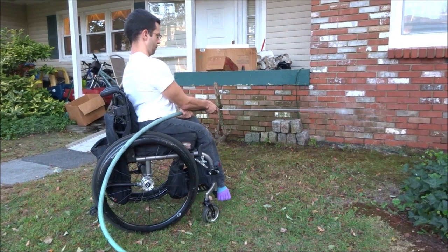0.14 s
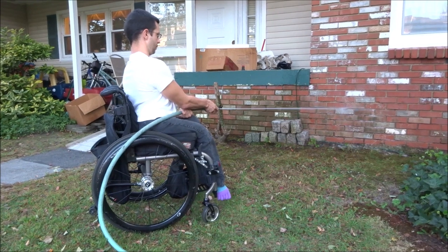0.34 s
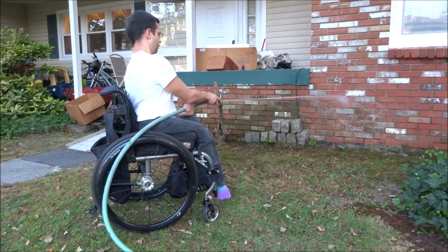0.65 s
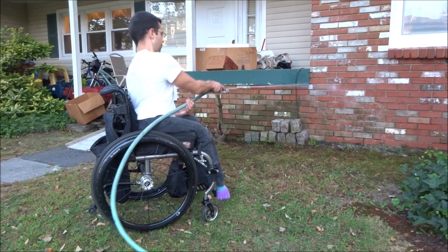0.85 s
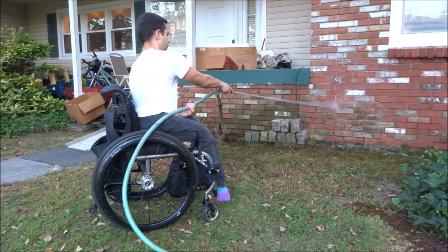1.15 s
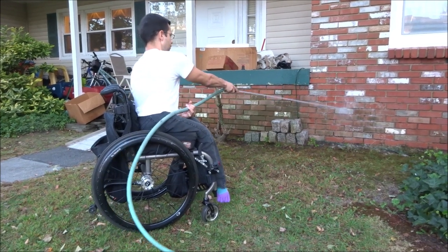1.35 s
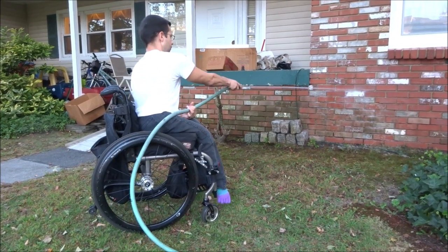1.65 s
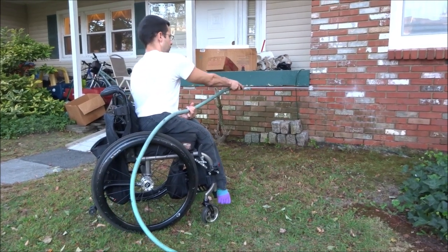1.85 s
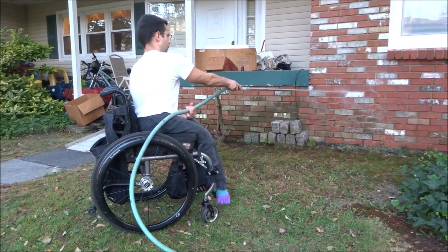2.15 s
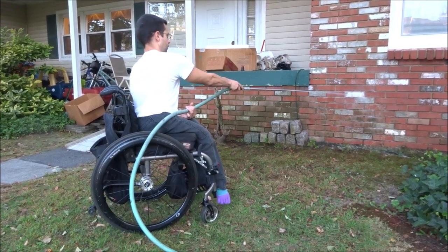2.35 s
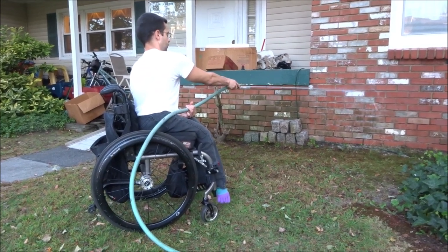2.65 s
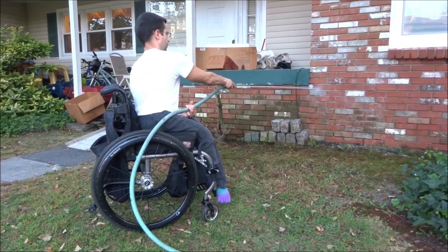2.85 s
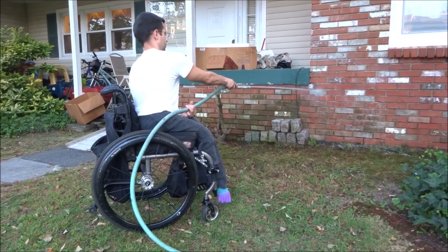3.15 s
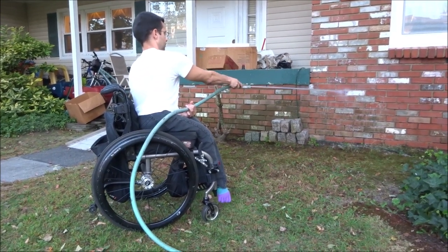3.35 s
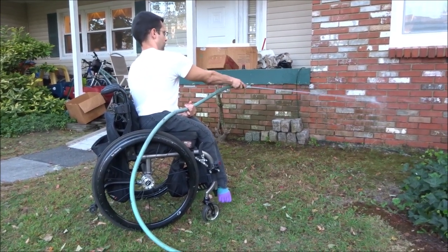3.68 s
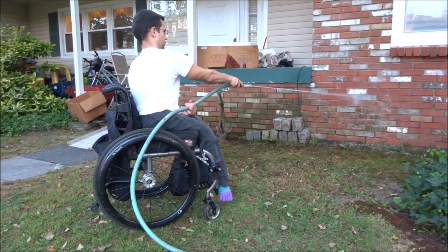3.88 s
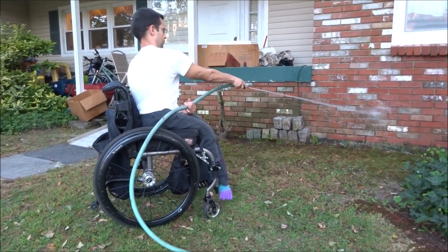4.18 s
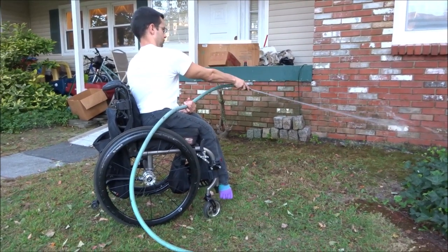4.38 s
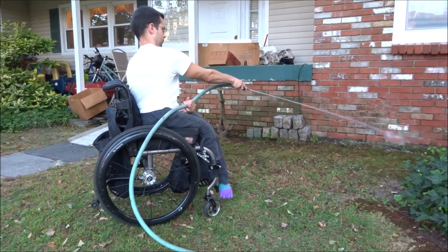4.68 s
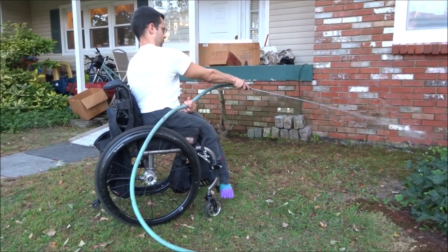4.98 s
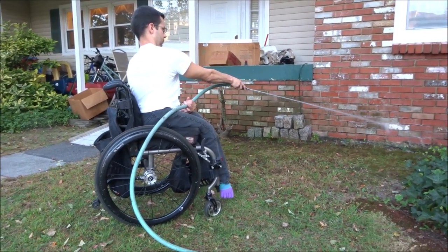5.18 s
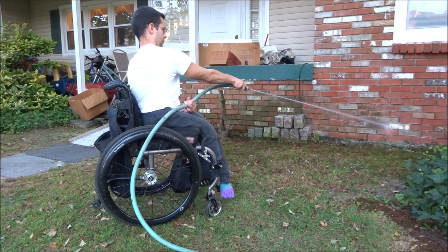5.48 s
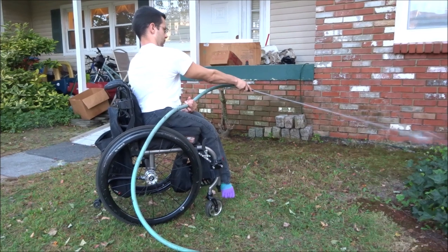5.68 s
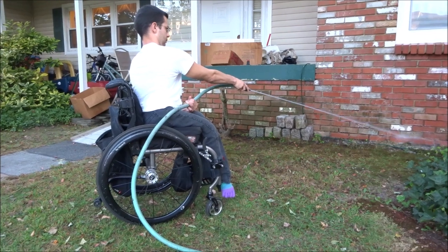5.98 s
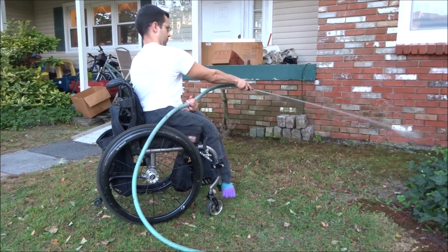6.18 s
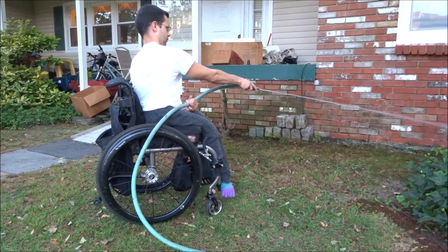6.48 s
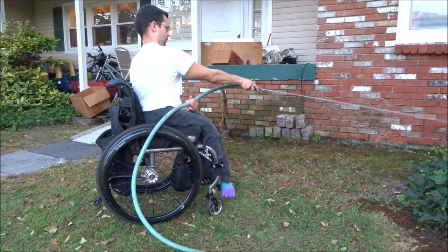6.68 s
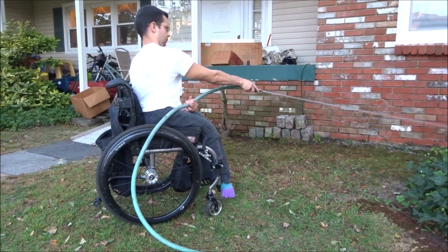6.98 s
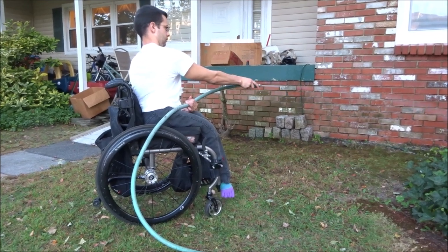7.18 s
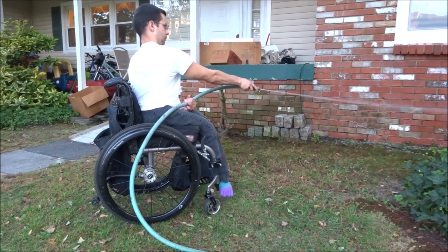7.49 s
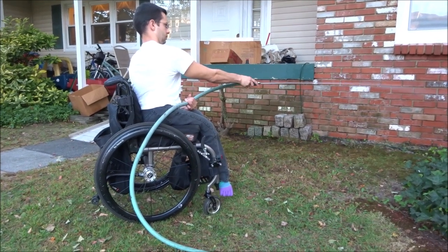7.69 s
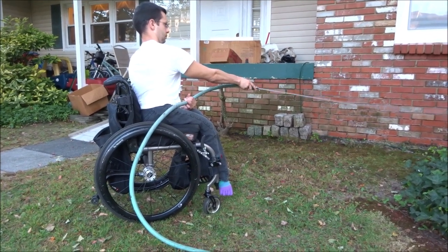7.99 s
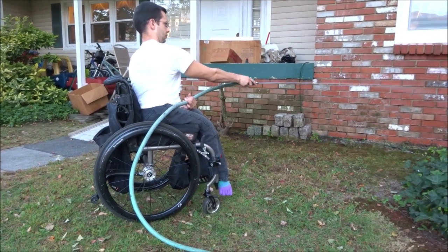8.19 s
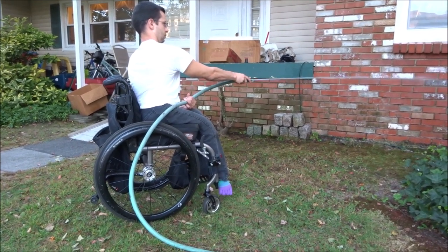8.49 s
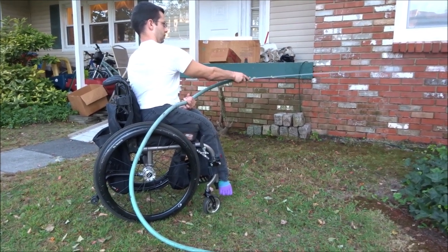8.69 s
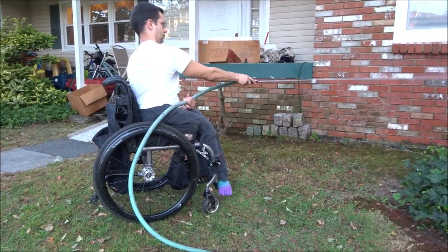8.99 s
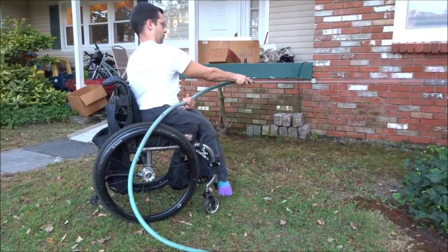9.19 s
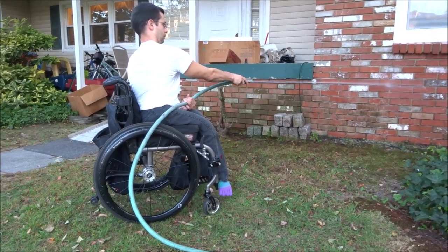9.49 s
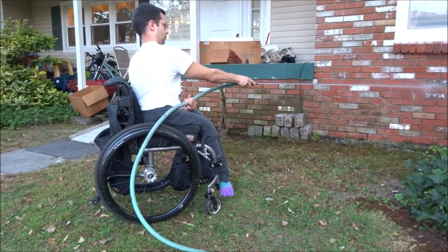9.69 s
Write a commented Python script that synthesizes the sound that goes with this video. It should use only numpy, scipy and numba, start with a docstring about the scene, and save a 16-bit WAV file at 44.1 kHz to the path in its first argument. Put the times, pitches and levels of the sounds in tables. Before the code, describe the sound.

Water from a garden hose hisses and splatters against bricks in uneven surges, over soft run-off patter and a barely audible traffic hum.

```python
"""A narrow hose jet sweeps a brick wall a few metres off, across a lawn. From the start, fine drops
crackle into mist, bigger slugs slap and ring the air they trap in mortar joints, ledge and ground
echo, run-off patters below and far traffic hums. From 0.3 s, surges of heavy water come irregularly.
From 3.1 s, far engine notes fade in and out and the traffic grows. The ledge echo all but vanishes
at 4.5 s and returns near 9.5 s."""
import sys
import numpy as np
from scipy import signal
from scipy.fft import rfft, irfft
from scipy.io import wavfile
from scipy.ndimage import uniform_filter1d, map_coordinates
from numba import njit

SR = 44100
rng = np.random.default_rng(int(sys.argv[2]) if len(sys.argv) > 2 else 0)


def pcm_store(signal):
    """Save signal as 16-bit PCM."""
    levels = np.round(np.clip(np.atleast_2d(signal), -1, 1) * 32767)
    wavfile.write(sys.argv[1], SR, levels.astype(np.int16).T)


N = 433944

# Jet between surges: t/s, mist/dB, spray, ring, slaps (each /dB re mist), ring f/Hz, run-off/dB
JET = [(0, -23.5, -2, -1.5, -14.5, 5000, -54.5), (0.4, -24, -5.5, -4, -14, 4760, -59),
       (0.7, -26, -0.5, -0.3, -9, 4370, -56), (1.3, -24.5, -1, -1.2, -11, 4830, -59),
       (2, -24.5, -4, -2, -15, 4670, -57.0), (2.7, -26, 0, -1.3, -11.5, 4470, -60),
       (3.5, -23, -4, -5, -14.5, 4570, -57.5), (4.2, -25.5, -1.5, -1.5, -11.5, 4430, -53.5),
       (4.7, -25.5, -3.5, -3.7, -11.5, 4430, -49.5), (5.2, -26.5, -2.5, -2.5, -12.5, 3720, -54.5),
       (5.8, -24.5, -3, -6.5, -16.5, 4500, -51.5), (6.3, -26, -4, -1.9, -12.2, 4240, -48.5),
       (6.9, -27.0, -6.5, -0.4, -10.5, 4460, -50.0), (7.2, -30, -3, -1.5, -11, 4340, -46.5),
       (7.6, -27.5, -5.6, -1.6, -10.5, 4330, -46.5), (8.3, -27.5, -2.5, -4.5, -10.5, 4310, -50),
       (8.7, -26.4, -0.5, -1.1, -13.8, 4600, -52), (9.3, -26.5, -3, -1.7, -12.5, 4430, -51.2),
       (9.84, -26, -3.5, -2.2, -10.5, 4170, -47.5)]
# Heavy water: centre t/s, length/s, slap lift/dB, ring lift/dB, ring f/Hz, run-off lift/dB
SURGES = [(0.306, 0.13, 3, 3, 3530, -3), (0.521, 0.087, 9.5, -7, 3540, 12), (0.696, 0.089, 4, 7.5, 3730, 3),
          (0.808, 0.022, -2, 12, 4300, -9), (0.952, 0.022, 6.5, 11, 4070, -2),
          (1, 0.019, 7.5, 15, 4580, -5), (1.052, 0.028, 5, 11, 4250, -6), (1.158, 0.025, 7, 11, 4500, 0),
          (1.207, 0.084, 11, 2, 4340, 6), (1.42, 0.034, 2, 10, 3550, 7), (1.532, 0.052, 7, 1, 3600, 7),
          (1.633, 0.073, 1, 8, 4300, 3), (1.845, 0.02, 9, 4, 4300, -1), (2.135, 0.045, 6.5, 9.5, 4100, -8),
          (2.625, 0.15, 3, 14.5, 4180, 5), (2.94, 0.067, 10.5, 9.5, 4270, 4), (3.024, 0.028, 6, 5, 3870, 2),
          (3.246, 0.1, 5.5, 8, 4200, 1), (3.36, 0.088, 7, 4, 4600, 9), (3.53, 0.062, 10, 9, 3800, 8.5),
          (3.853, 0.016, 7, 4, 3600, -5), (4.03, 0.053, 9.5, 13, 3920, -3), (4.12, 0.079, 8, 7, 4550, 3),
          (4.264, 0.044, 12, -7, 3360, 8), (4.343, 0.028, 6, 2, 3690, 1), (4.768, 0.082, 7, 1, 3450, 3),
          (4.984, 0.034, 9, 11, 4000, 5), (5.178, 0.025, -2, 8, 3570, 7), (5.348, 0.11, 3, 2, 2890, 8),
          (5.534, 0.093, 5, 6, 3670, 11), (5.7, 0.043, 6, 14, 4270, 6), (5.935, 0.04, 0, 13, 4240, 5),
          (5.974, 0.021, 11, 7, 4830, 10), (6.118, 0.091, 9, 1, 3020, 7), (6.388, 0.024, 2, -10, 3150, 2),
          (6.514, 0.042, 5, 14, 4680, -6), (6.565, 0.039, -1, 5, 3900, -3), (6.753, 0.029, 1, 12, 4100, -3),
          (6.823, 0.074, 4, 14, 4160, 0), (6.884, 0.066, -1, 12.5, 4200, 1), (7.03, 0.016, -4, 9, 3960, 2),
          (7.412, 0.048, 7, 12, 4330, -2), (7.49, 0.15, 2, -1, 3750, -2), (7.521, 0.03, 4, 10, 4100, 3),
          (7.554, 0.023, -1, 11, 4300, 5), (7.644, 0.037, 3, 9, 3840, 6), (7.845, 0.041, 6, 15.5, 4200, -3),
          (8.13, 0.079, 3, 8, 3770, 2), (8.357, 0.044, 4, 17.5, 4080, 2.5), (8.466, 0.023, 2, 14, 4140, 4),
          (8.593, 0.033, 5, 18, 4200, -3), (8.776, 0.025, 6, 11, 4970, 3), (8.864, 0.11, 2.5, 4, 3980, 9.5),
          (9.024, 0.047, 1, -15, 3170, 10.5), (9.082, 0.052, 4, 7, 4400, 7), (9.21, 0.039, 5, -9, 4900, 1),
          (9.28, 0.019, -5, 8, 4200, 5.5), (9.402, 0.042, -3, 10, 4000, -4),
          (9.618, 0.13, 7, 11.5, 4080, 2)]
# Landing spot: t/s, mist peak f/Hz, peak level/dB re mist, left minus right/dB
AIM = [(0, 8600, -22, -.9), (.6, 7500, -39, -.7), (2.2, 7550, -19, -1), (3.0, 7800, -32, -.7),
       (4.0, 7800, -25, -1.2), (5.1, 7430, -24, -1.8), (5.85, 7330, -12, -1.8), (6.4, 7130, -22, -1.9),
       (7.4, 7000, -14.5, -2.5), (8.4, 7130, -12, -2), (9.84, 7100, -29, -1.7)]
# Echoes moving with the aim: t/s, ledge delay/ms, ledge level/dB, ground delay/ms
ECHOES = [(0, 0.53, -7, 1.5), (.45, 0.61, -8, 2.3), (.75, 0.87, -15, 1.5), (1.3, 0.51, -20, 1.93),
          (1.75, 0.92, -12, 1.95), (2.4, 0.84, -8.5, 1.93), (3.4, .86, -8, 1.9), (3.7, 0.76, -8.5, 1.7),
          (4.1, 0.68, -8, 1.93), (4.5, .7, -47, 1.76), (6.3, 0.83, -43, 1.96), (6.7, 0.74, -30, 1.82),
          (8.3, 0.49, -29, 1.9), (9.2, 0.83, -36, 1.95), (9.5, 0.88, -1, 2.1), (9.84, .87, -12, 1.8)]
# Traffic rumble: t/s, deep level/dB, upper level/dB
TRAFFIC_LEVELS = [(0, -79, -75), (0.3, -80, -80), (0.6, -68, -62), (0.8, -74, -70), (2.7, -79.5, -76),
                  (3.6, -68, -61.5), (4.2, -66, -60.5), (4.6, -67, -62), (5.2, -71.5, -67.5),
                  (6, -71, -61.5), (6.5, -61, -59), (7.6, -63, -56), (8.2, -66, -61), (8.7, -71, -67),
                  (9.2, -71, -63), (9.84, -66, -65)]
# Engine notes: start t/s, end t/s, first f/Hz, last f/Hz, fundamental/dB, octave/dB
ENGINE_NOTES = [(3.106, 4.307, 122.4, 139.4, -79, -62.5), (3.95, 4.35, 148, 159, -60, -76),
                (6.1, 7.6, 140, 141.2, -62, -73), (7.45, 10.1, 104.8, 104.6, -78.5, -67)]
# Spectral shapes: f/Hz, relative level/dB
MIST_SHAPE = [(3000, -35), (4800, -5.5), (5600, -1), (6700, 0), (7600, 0.5), (8500, -1.5), (9500, -18)]
SPRAY_SHAPE = [(7500, -23.5), (8600, 1), (9300, 7), (10500, 10), (12000, -7.5)]
SLAP_SHAPE = [(700, -23.5), (1200, -8), (1600, -7), (2000, -3), (2500, -1), (3100, 1.5), (3800, 4),
              (5000, -31)]
RUNOFF_SHAPE = [(350, -43.5), (500, -9), (700, 2), (850, -0.5), (1000, -6.5), (1300, -5), (2000, -30)]
DEEP_TRAFFIC_SHAPE = [(25, -24), (50, -16), (80, -6), (130, 2.5), (170, -1.5), (200, -11), (280, -37)]
UPPER_TRAFFIC_SHAPE = [(120, -26), (185, -1.5), (215, 0.5), (270, 1), (369, -2.5), (430, -6), (520, -20),
                       (700, -37)]


def undb(db):
    return 10 ** (np.asarray(db) / 20)


def unit(x):
    return x / np.sqrt(np.mean(x ** 2))


def curves(table):
    """Columns after t/s, interpolated per sample."""
    t_s, *columns = np.transpose(table)
    return [np.interp(np.arange(N) / SR, t_s, c) for c in columns]


def walk(rate_hz):
    """Random steps, smoothed twice; deviation near 1."""
    hold = int(SR / rate_hz)
    steps = rng.standard_normal(N)[np.arange(N) // hold]
    return 1.286 * uniform_filter1d(uniform_filter1d(steps, hold), hold)


def colour(pair, shape, size=8192):
    """Minimum-phase filter via the cepstrum; output rms 1."""
    hz, db = np.transpose(shape)
    log_hz = np.log(np.arange(size // 2 + 1) * SR / size + 1)
    log_gain = np.interp(log_hz, np.log(hz), db, left=db[0] - 19) * np.log(10) / 20
    cepstrum = irfft(log_gain)
    cepstrum[1:size // 2] *= 2
    cepstrum[size // 2 + 1:] = 0
    response = irfft(np.exp(rfft(cepstrum)))
    return unit(signal.fftconvolve(pair, response[None], axes=1)[:, :N])


@njit
def bandpass(x, hz, width_hz):
    """State-variable filter, retuned per sample."""
    y, band, low = np.empty(len(x)), 0., 0.
    for i in range(len(x)):
        g, damping = np.tan(np.pi * hz[i] / SR), width_hz / hz[i]
        v = (band + g * (x[i] - low)) / (1 + g * (g + damping))
        band, low, y[i] = 2 * v - band, low + 2 * g * v, damping * v
    return y


def resonate(channels, hz, width_hz):
    """Band-pass twice for steep skirts; output rms 1."""
    return unit(np.array([bandpass(bandpass(c, hz, width_hz), hz, width_hz) for c in channels]))


def delay(pair, ms):
    at = np.arange(N) - ms * SR / 1000
    return np.array([map_coordinates(c, [at], order=3, mode="nearest") for c in pair])


def drops(rate_hz, scatter_db, decay_ms):
    """Random impacts of uneven size, each a decaying noise burst."""
    chance, size = rng.random((2, N))
    hits = (chance < rate_hz / SR) * undb(np.minimum(-scatter_db * np.log(1 - size), 6))
    pole = np.exp(-1000 / (decay_ms * SR))
    return unit(signal.lfilter([1], [1, -pole], hits) * rng.standard_normal(N))


def spread(x, hiss_db, side_db):
    """Mono to stereo: add steady hiss, and side noise that follows the level."""
    hiss, side = rng.standard_normal((2, N))
    envelope = np.sqrt(uniform_filter1d(x ** 2, size=600) + undb(2 * hiss_db))
    return x + undb(hiss_db) * hiss + undb(side_db) * envelope * side * np.array([[1], [-1]])


def surge_curves(rise=0.34, fall=0.51):
    """Lifts, 0-1 weight and pitch of the surges; rise and fall are shares of their length."""
    slap_db, ring_db, runoff_db, weight, pitch_hz = np.zeros((5, N))
    t = np.arange(N) / SR
    for centre_s, length_s, slap_up_db, ring_up_db, hz, runoff_up_db in SURGES:
        span = slice(max(int((centre_s - 2 * length_s) * SR), 0), int((centre_s + 2 * length_s) * SR))
        offset_s = t[span] - centre_s
        bump = np.exp(-(offset_s / (np.where(offset_s < 0, rise, fall) * length_s)) ** 2)
        slap_db[span] += slap_up_db * bump
        ring_db[span] += ring_up_db * bump
        runoff_db[span] += runoff_up_db * bump
        pitch_hz[span] = np.where(bump > weight[span], hz, pitch_hz[span])
        weight[span] = np.maximum(weight[span], bump)
    return slap_db, ring_db, runoff_db, weight, pitch_hz


def mist(stream, peak_hz, peak_db):
    """Fine drops burst on brick; a faint treble peak follows the aim."""
    impacts = spread(stream, hiss_db=-1.7, side_db=-15.5)
    peak = resonate(impacts, peak_hz * (1 + 0.012 * walk(5.8)), width_hz=1060.)
    crackle = unit(colour(impacts, MIST_SHAPE) + undb(peak_db) * peak)
    return crackle * undb(0.77 * walk(40) + 0.77 * walk(7))


def spray(stream):
    """The finest drops sizzle above the mist."""
    impacts = spread(stream + 1.3 * drops(1200, 4.9, 0.11), hiss_db=-0.17, side_db=-14)
    return colour(impacts, SPRAY_SHAPE) * undb(1.2 * walk(6.4) + 0.51 * walk(40))


def pocket_ring(slugs, ring_hz):
    """Slugs ring air trapped in the joints; pocket sizes vary, so the pitch wanders."""
    impacts = spread(slugs, hiss_db=-3, side_db=-25)
    narrow = resonate(impacts, ring_hz * (1 + 0.059 * walk(25)), width_hz=770.)
    broad = resonate(impacts, 0.92 * ring_hz, width_hz=2180.)
    return unit(narrow + 2.03 * broad) * undb(0.66 * walk(13) + 1.36 * walk(45))


def slaps(slugs, ring_hz):
    """Heavy water hits the wall: a broad smack below the ring."""
    impacts = spread(slugs + 1.18 * drops(120, 3.6, 3.2), hiss_db=2, side_db=-7.5)
    body = resonate(impacts, 0.735 * ring_hz * (1 + 0.13 * walk(40)), width_hz=320.)
    smack = unit(colour(impacts, SLAP_SHAPE) + 0.19 * body)
    return smack * undb(1.76 * walk(8.5) + 0.72 * walk(25))


def echoes(direct, ground_db=-22.5, tail_db=-13, t60_s=0.038):
    """Direct sound plus ledge and ground echoes and scatter off porch and house fronts."""
    ledge_ms, ledge_db, ground_ms = curves(ECHOES)
    dull = signal.sosfilt(signal.butter(1, 5900, fs=SR, output="sos"), direct)  # brick scatters treble
    ledge = undb(ledge_db) * delay(dull, ledge_ms + 0.025 * walk(5.4))
    ground = undb(ground_db) * delay(direct, ground_ms)
    t = np.arange(SR // 4) / SR
    response = rng.standard_normal(len(t)) * undb(-60 * t / t60_s) * (t > .003)
    tail = signal.fftconvolve(direct, response[None] / np.linalg.norm(response), axes=1)[:, :N]
    return direct + ledge + ground + undb(tail_db) * tail


def runoff(level_db):
    """Water off the wall patters on wet soil, slightly right."""
    patter = colour(spread(drops(150, 2.2, 9.6), hiss_db=-0.36, side_db=-7), RUNOFF_SHAPE)
    return patter * undb(level_db + 0.98 * walk(22) + np.array([[-.4], [.4]]))


def traffic():
    """Far road: two bands of rumble with a partly shared flutter."""
    deep_db, upper_db = np.array(curves(TRAFFIC_LEVELS)) + 1.8 * walk(13)
    deep = colour(spread(rng.standard_normal(N), hiss_db=-9, side_db=-18), DEEP_TRAFFIC_SHAPE)
    upper = colour(spread(rng.standard_normal(N), hiss_db=-5.5, side_db=-11), UPPER_TRAFFIC_SHAPE)
    return deep * undb(deep_db + 1.4 * walk(12)) + upper * undb(upper_db + 2 * walk(15))


def slug_clusters(mist_db, re_mist_db=-9):
    """One cluster per surge: dense impacts swell, ring at their own pitch and die."""
    out = np.zeros(N)
    impacts = drops(900, 1.7, 0.85)
    for centre_s, length_s, _, ring_up_db, hz, _ in SURGES:
        start = int((centre_s - length_s / 2) * SR)
        t = np.arange(min(int(3 * length_s * SR), N - start)) / SR
        span = slice(start, start + len(t))
        pitch_hz = hz * (1 + 0.5 * t)  # pockets shrink as they burst
        ring = resonate([impacts[span]], pitch_hz, width_hz=1060.)[0]
        body = resonate([impacts[span]], .55 * pitch_hz, width_hz=1800.)[0]
        envelope = (1 - np.exp(-t / (0.21 * length_s))) * np.exp(-(t / (0.74 * length_s)) ** 2)
        out[span] += undb(mist_db[start] + re_mist_db + ring_up_db) * (ring + 0.071 * body) * envelope
    return out


def engines(fade_s=0.19):
    """Far engines: each a rough, wavering note and its octave."""
    out, t = np.zeros(N), np.arange(N) / SR
    for start_s, end_s, first_hz, last_hz, low_db, octave_db in ENGINE_NOTES:
        hz = np.interp(t, [start_s, end_s], [first_hz, last_hz])
        phase = 2 * np.pi * np.cumsum(hz * (1 + 0.014 * walk(11) + 0.0262 * walk(70))) / SR
        fade = np.clip(np.minimum(t - start_s, end_s - t) / fade_s, 0, 1)
        low = undb(low_db + 1.4 * walk(14)) * np.sin(phase)
        octave = undb(octave_db + 2.3 * walk(13)) * np.sin(2 * phase)
        out += fade * np.sqrt(2) * (low + octave)
    return out


def scene():
    """Jet on the wall over run-off and traffic; one drop stream makes its bands crackle together."""
    mist_db, spray_db, ring_db, slap_db, base_hz, runoff_db = curves(JET)
    slap_up_db, ring_up_db, runoff_up_db, surge_weight, surge_hz = surge_curves()
    peak_hz, peak_db, pan_db = curves(AIM)
    ring_hz = (base_hz + 0.82 * surge_weight * (surge_hz - base_hz)) * (1 + 0.026 * walk(9.8))
    stream = drops(rate_hz=700, scatter_db=2.5, decay_ms=.12)
    slugs = .5 * stream + drops(rate_hz=220, scatter_db=3.5, decay_ms=1.06)
    flutter = walk(18)
    # mist and spray dip as the slaps rise
    splash = mist(stream, peak_hz, peak_db) * undb(0.81 * flutter - 0.11 * slap_up_db)
    splash += spray(stream) * undb(spray_db + 0.72 * flutter - 0.061 * slap_up_db)
    splash += pocket_ring(slugs, ring_hz) * undb(ring_db + 0.18 * flutter + 0.38 * ring_up_db)
    splash += slaps(slugs, ring_hz) * undb(slap_db + 0.26 * flutter + slap_up_db)
    wall = echoes(splash * undb(mist_db) + slug_clusters(mist_db))
    pan = undb(np.array([pan_db, -pan_db]) / 2)
    return wall * pan + runoff(runoff_db + runoff_up_db) + traffic() + engines()


def record(dry, bass_hz=110, top_hz=11000):
    """A small camera rounds the loudest splashes, thins the bass and cuts the top."""
    rounded = np.tanh(1.143 * dry) / 1.014
    thin = signal.sosfilt(signal.butter(1, bass_hz, "high", fs=SR, output="sos"), rounded)
    return signal.sosfilt(signal.ellip(16, .3, 100, top_hz, fs=SR, output="sos"), thin)


dry = scene()
out = record(dry)
pcm_store(out)
```